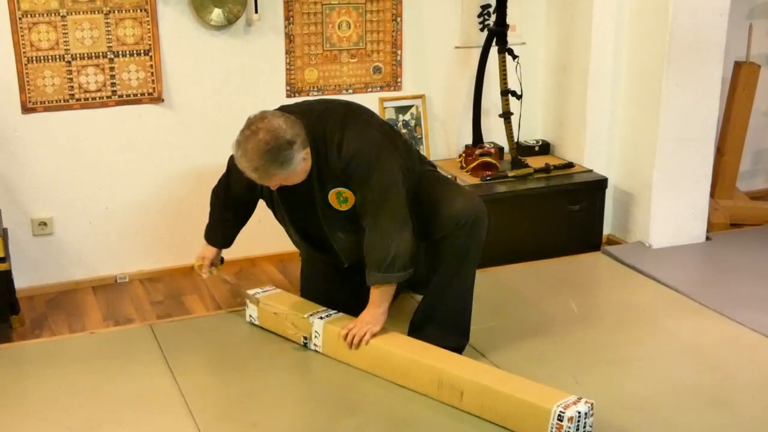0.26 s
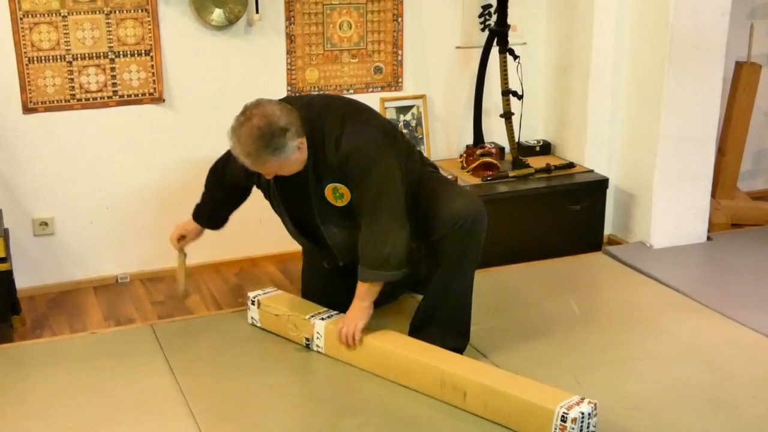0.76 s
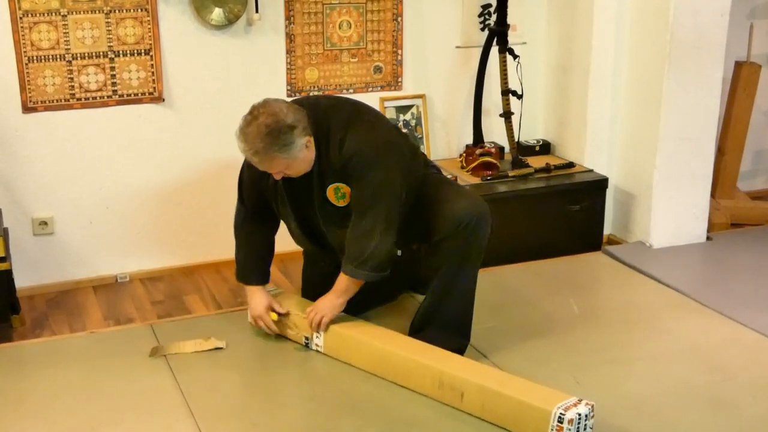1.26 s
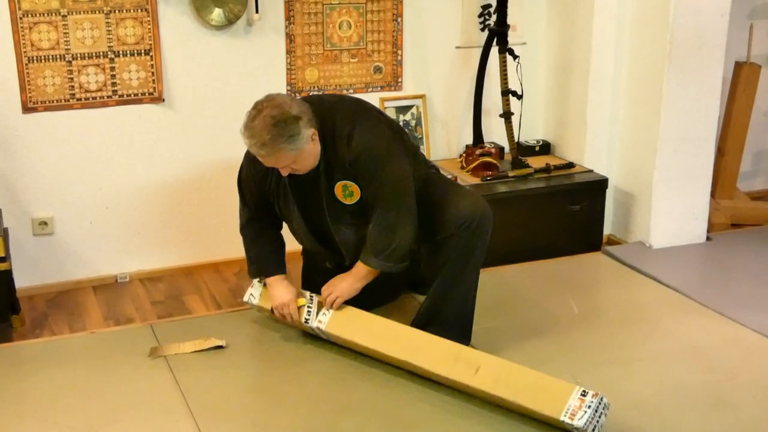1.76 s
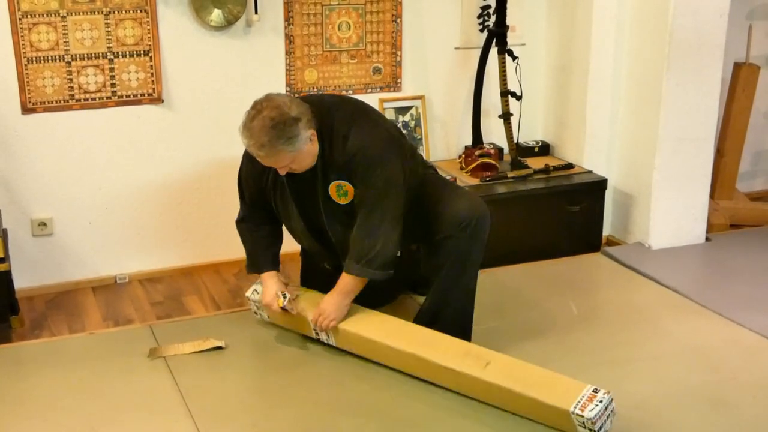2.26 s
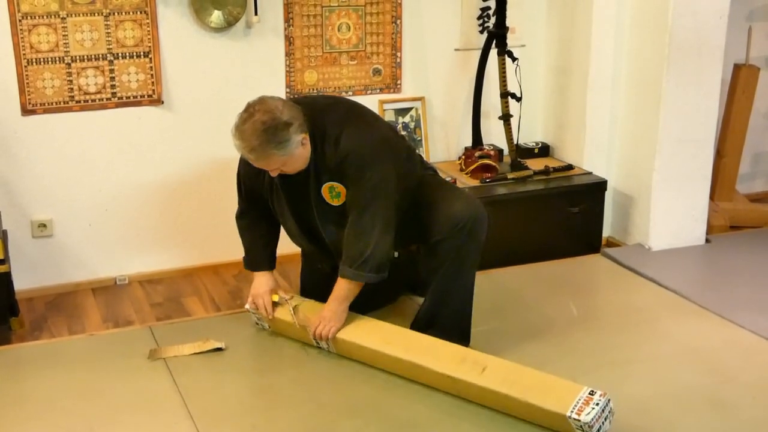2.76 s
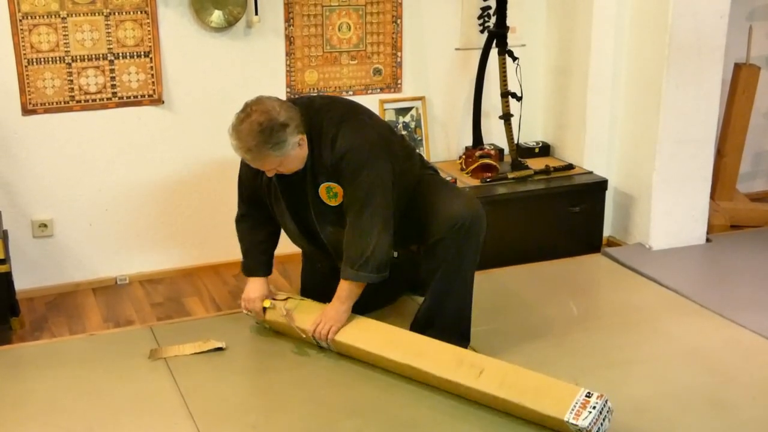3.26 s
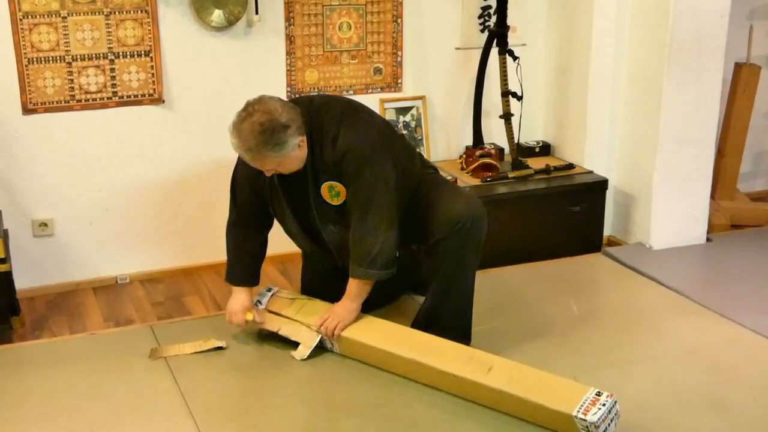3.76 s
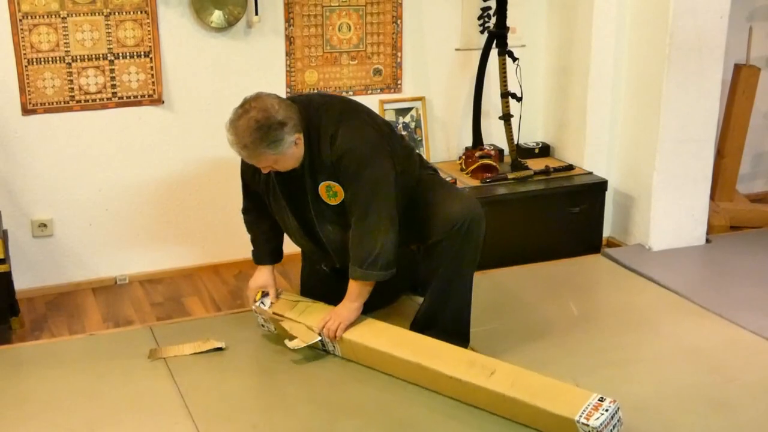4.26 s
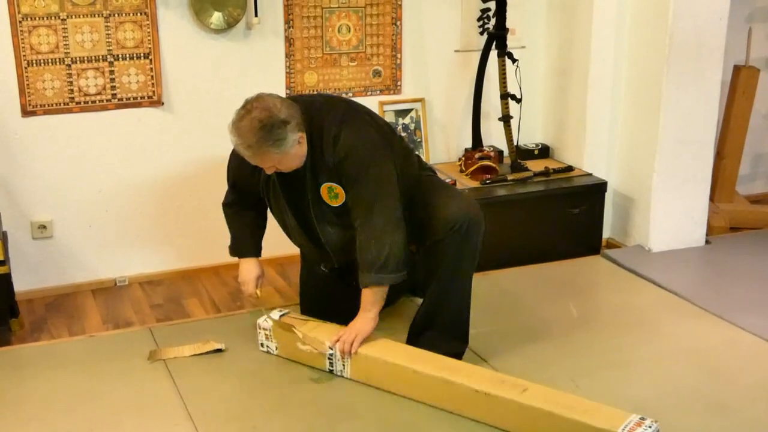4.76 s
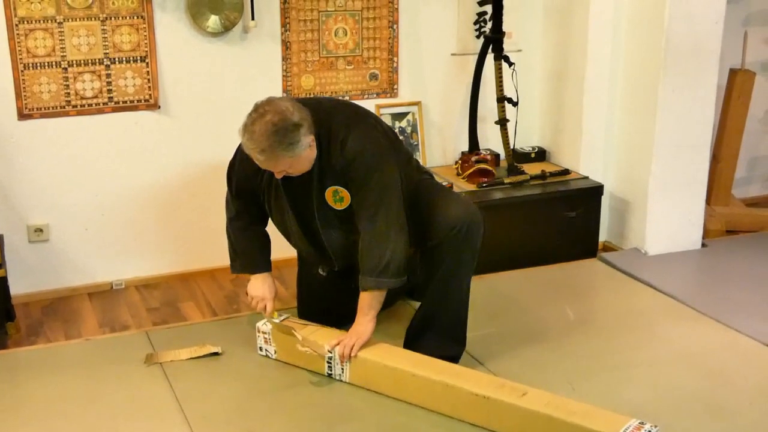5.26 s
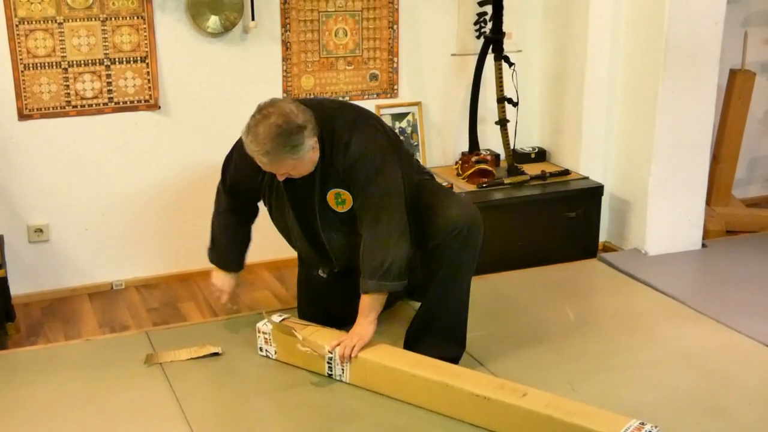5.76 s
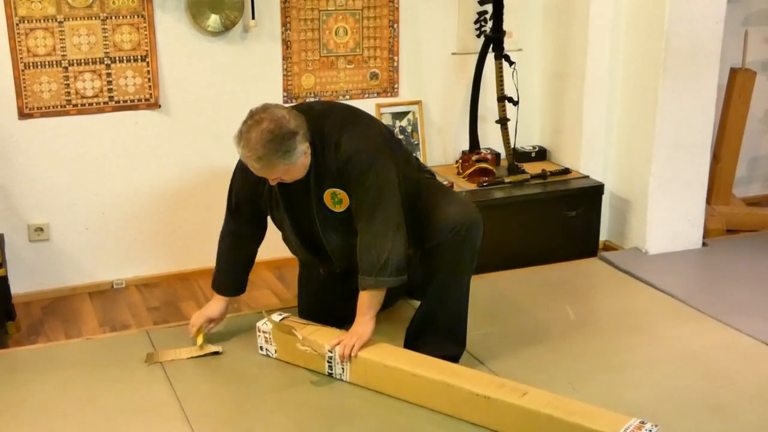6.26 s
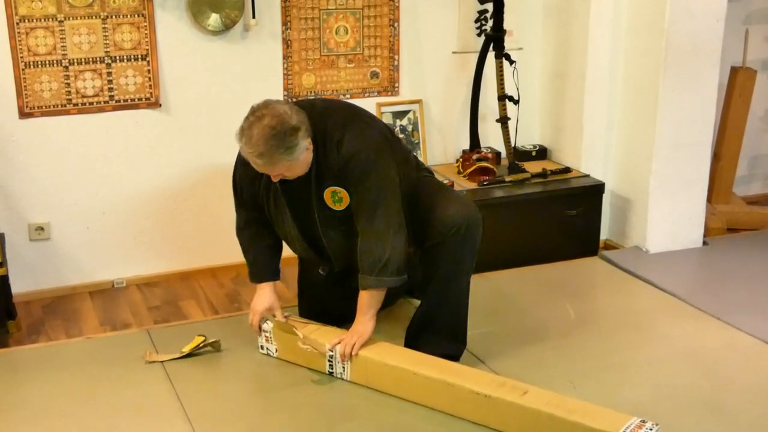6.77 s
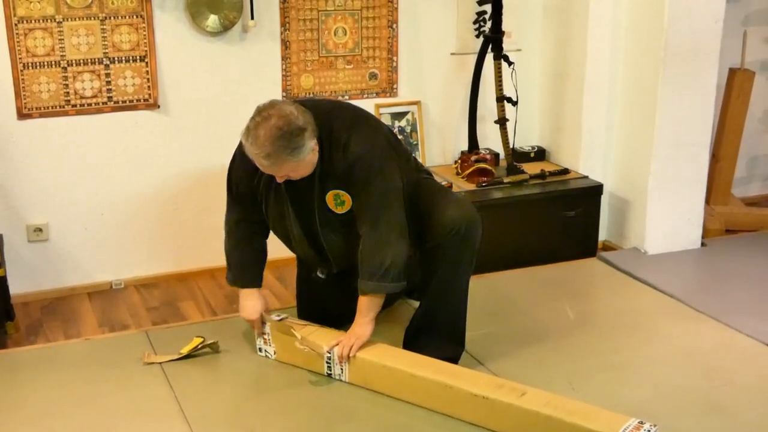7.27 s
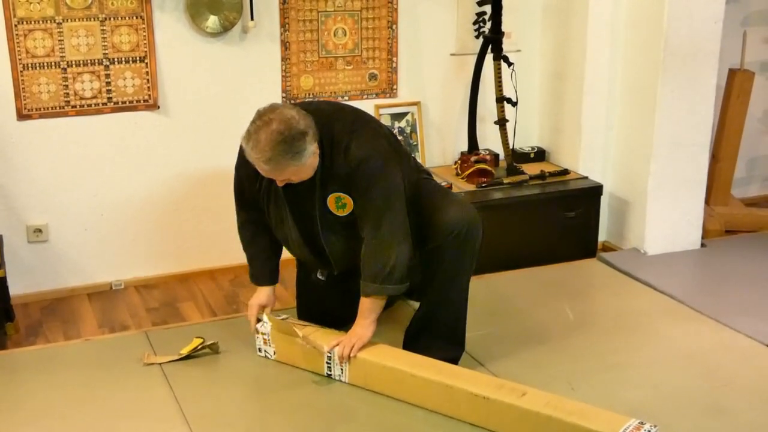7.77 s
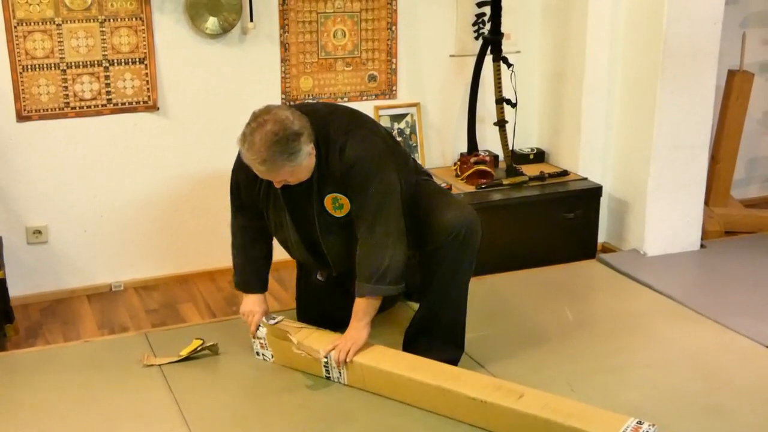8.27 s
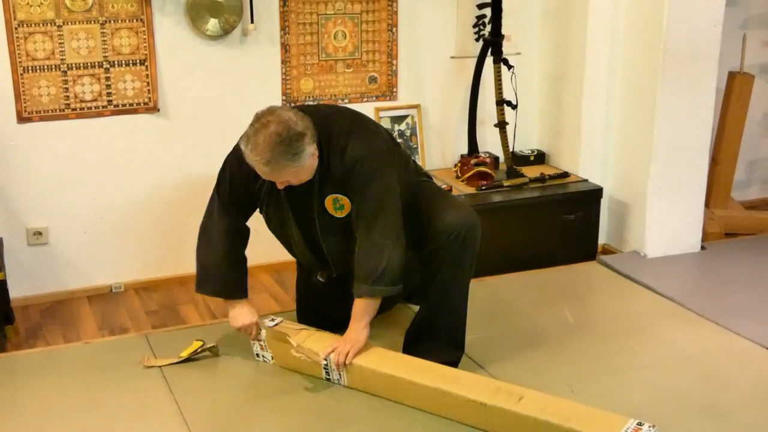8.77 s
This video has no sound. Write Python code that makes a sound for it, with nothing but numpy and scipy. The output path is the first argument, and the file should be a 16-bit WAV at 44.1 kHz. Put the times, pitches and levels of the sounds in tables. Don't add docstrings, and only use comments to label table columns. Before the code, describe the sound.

The sound begins mid-rip: until about 0.4 s packing tape peels from a long cardboard box in bright, dense crackles with small snaps, fading by 0.5 s. Around 1 s the hollow box bumps softly on the mat, with light rubbing. At 1.75 to 2 s come a sharp tear, a strong hollow thump and cardboard buckling, then quieter rustles. From 3.0 to 3.5 s a loud cluster of fibrous rips and another low knock. Small pops and shuffles follow at 4.1 to 4.5 s and 5.2 s; at 5.5 to 5.65 s a hard tear and rapid buckling cracks. At 6.3 s a bright snap lands with low bumps. Faint handling and a small peel around 7.2 s lead to a stuttering cardboard creak from 7.9 to 8.3 s, then brief creaks and a tape peel at 8.5 to 8.9 s. Everything echoes in a bare hall, heard from metres away over faint hush.

```python
import sys
import numpy as np
from scipy import signal
from scipy.fft import rfft, irfft, next_fast_len
from scipy.io import wavfile
from scipy.ndimage import uniform_filter1d, map_coordinates

SR = 44100
rng = np.random.default_rng(int(sys.argv[2]) if len(sys.argv) > 2 else 0)


def magnitude_from_level(level_db):
    exponent = np.asarray(level_db, float) / 20
    return 10 ** exponent


def generate_wav(sig):
    pcm = np.round(np.clip(np.atleast_2d(sig).T, -1, 1) * 32767).astype(np.int16)
    wavfile.write(sys.argv[1], SR, pcm)


N = 398223
LEAD = SR // 2

# (frequency [Hz], level [dB])
AIR_COLOUR = [(40, -60), (100, -19.5), (160, -3.5), (240, -5.5), (330, 1.5), (480, -6), (900, -57)]
# (frequency [Hz], level [dB])
WALL_COLOUR = [(150, -42), (330, -2.5), (450, 0), (580, 0.5), (750, -4.5), (1000, -7), (1500, -40),
               (4000, -65)]
# (frequency [Hz], level [dB])
FLAP_COLOUR = [(400, -29), (900, 0.5), (1200, -0.5), (1500, 0), (2200, -1), (3000, -2), (4500, -16),
               (9000, -50)]
# (frequency [Hz], level [dB])
FILM_COLOUR = [(1000, -46), (2700, -9), (3700, -1.5), (6800, -4), (8300, -6.5), (9800, -3), (11500, -9.5),
               (13000, -30)]
# (slip rate [1/s], size scatter [dB])
SLIP_HABITS = [(900, 4.5), (1200, 11), (2500, 5), (4000, 13)]
# (start [s], wall resonance [Hz], flap resonance [Hz], film resonance [Hz], lift [dB])
HOLDS = [(0, 694, 2000, 4500, 3), (.6, 890, 1540, 3600, 3), (0.957, 560, 1340, 3347, 5),
         (1.18, 590, 1320, 8600, 3.5), (1.735, 982, 2960, 3780, 3), (1.89, 598, 1600, 10300, 3.5),
         (3.02, 670.5, 1506, 10060, 1.5), (3.34, 593, 1390, 3370, 7), (4.09, 564, 1590, 8500, 3.5),
         (4.46, 387, 2000, 7100, 3.5), (5.05, 705, 1912, 4217, 6), (5.215, 784, 1190, 4390, 10.5),
         (5.47, 650, 940, 5600, 4.5), (5.56, 716, 1540, 3100, 4.5), (6.24, 296, 1022, 3870, 6.5),
         (6.325, 1060, 2430, 6840, 8.5), (6.63, 624, 2400, 5000, 4), (6.72, 584, 2800, 6800, 0.3),
         (7.55, 890, 977, 3220, 2), (7.7, 450, 1300, 6000, 2), (7.9, 564, 1350, 2406, 5),
         (8.5, 540, 1202, 3200, 5.5), (8.59, 560, 1856, 9600, 4)]
# (start [s], length [s], pull [dB], fade [dB], film over flap [dB])
PEELS = [(-.4, 0.39, -40, 1.5, 8), (.03, 0.21, -49, -3, 0), (.29, 0.11, -40, 2.5, 3.5),
         (.4, 0.084, -43.5, -3, -3), (.66, 0.28, -53.5, 8.5, 0.5), (.99, 0.16, -55, 10, 5),
         (1.2, 0.29, -56, 5, 2.5), (1.58, 0.14, -55, 7, 2), (1.77, 0.097, -44.5, 7, -6),
         (1.97, 0.21, -44.5, 4, -2.5), (2.2, 0.15, -51.5, -3, 0.5), (2.54, 0.093, -55.5, 1.5, 4.5),
         (2.8, 0.28, -55, -1, 0.5), (3.06, 0.22, -46, -13, 1), (3.37, .15, -38.5, -2, -2),
         (3.55, 0.23, -48, 3.5, -1), (4.13, 0.28, -59, -11, 2.5), (4.55, 0.17, -53.5, 1, 4.5),
         (5.58, 0.047, -39, 0, -4.5), (5.68, 0.15, -52, 14, -24.5), (6.26, 0.027, -55, 6, 4),
         (6.33, 0.073, -41.5, 1, 3), (6.44, .12, -60, 8, 6), (6.68, 0.52, -65.5, -9.5, 3),
         (7.0, 0.093, -66, -1, 0), (7.19, 0.047, -43.5, 7.5, 5.5), (7.27, 0.056, -48.5, 7.5, 5.5),
         (7.35, 0.58, -62, 6.5, 3), (8.63, 0.12, -42, 12.5, 3.5), (8.76, 0.22, -56, 0.5, 7.5)]
# (share [dB], weight of the film column [1])
PEEL_PARTS = [(-23.5, -0.55), (-10, -0.89), (-1, -0.39), (-2, 0.92)]
# (start [s], length [s], pressure [dB], fade [dB], air over its share [dB])
BOARD_RUBS = [(-.4, 0.83, -40, 13.5, 5), (1.25, 0.42, -70.5, -15.5, 0.5), (1.98, 0.54, -64.5, -6, -2),
              (2.58, 0.43, -58.5, -3.5, 14.5), (3.08, 0.36, -52.5, -7.5, -5), (3.52, 0.12, -47.5, 13, 9),
              (3.88, 0.15, -74, 3, -1), (4.11, 0.063, -52, 9.5, 24), (4.6, 0.26, -51, 8.5, -17),
              (5.23, 0.1, -46.5, 4.5, -25), (6.05, 0.15, -67, 1, 1), (6.52, 0.22, -72, -20.5, -12),
              (6.8, 0.31, -54.5, -3.5, 6.5), (7.2, 0.78, -55.5, 7, 4), (7.92, 0.19, -40, 5.5, 11),
              (8.12, 0.2, -42, 2, 6), (8.52, 0.067, -51.5, 0, 22), (8.66, 0.46, -65, -13, 4)]
# (share [dB], weight of the air column [1])
RUB_SPREAD = [(-9.5, 0.5), (-2, 0.19), (-8, 0.034), (-23.5, 0.61)]


def box(span=2000):
    air_hz, rest_db = 246, -82.5
    t = (np.arange(N + LEAD) - LEAD) / SR
    grid, peel = strokes(PEELS, PEEL_PARTS, attack_s=0.038)
    _, rub = strokes(BOARD_RUBS, RUB_SPREAD, attack_s=0.015)
    s, felt_db, ms = blows()
    at = np.round(s * SR).astype(int)[:, None] + LEAD + np.arange(span)
    u = np.arange(span) / (SR / 1000) / np.clip(ms, 1.7, 14)[:, None]
    shape = (u + 1 / ms[:, None]) * np.exp(-2 * u)
    edges = [0] + [round(row[0] * SR) + LEAD for row in HOLDS[1:]] + [N + LEAD]
    colours = [AIR_COLOUR, WALL_COLOUR, FLAP_COLOUR, FILM_COLOUR]
    sound = np.zeros((len(colours), N + LEAD + SR))
    for k, (colour, (rate, scatter_db)) in enumerate(zip(colours, SLIP_HABITS)):
        steady = np.interp(t, grid, peel[k] + rub[k] + magnitude_from_level(rest_db))
        force = steady * slips(rate, scatter_db)
        burst = rng.standard_normal(at.shape) * shape
        if k == 0:
            burst[:, 0] += 1.35 * np.linalg.norm(burst, axis=1)
        else:
            burst[:, 0] += (15 - 4.0 * k) * shape[:, 0]
        burst *= magnitude_from_level(felt_db[k] + 20.5)[:, None] / np.linalg.norm(burst, axis=1, keepdims=True)
        force += np.bincount(at.ravel(), burst.ravel(), N + LEAD)[:N + LEAD]
        for row, a, b in zip(HOLDS, edges, edges[1:]):
            free_hz = row[k] if k else air_hz
            lift_db = row[-1] * (1.7 - 0.35 * k)
            part = signal.fftconvolve(force[a:b], response(colour, free_hz, lift_db))
            sound[k, a:a + len(part)] += part
    return sound[:, :N + LEAD]


def strokes(rows, parts, attack_s):
    release_s, edge_db = 0.039, 15
    jerk_db, jerks_per_s = 4.5, 70
    t = np.arange(-LEAD / SR, N / SR + 1, 1 / 1000)
    share, weight = np.transpose(parts)
    force = np.zeros((len(parts), len(t)))
    for s, length, db, fade_db, lean_db in rows:
        end = s + length
        times = [s - attack_s, s, end, end + release_s]
        levels = [-edge_db, 0, -fade_db, -fade_db - edge_db]
        shape_db = np.interp(t, times, levels, -200, -200)
        force += magnitude_from_level(db + share + weight * lean_db)[:, None] * magnitude_from_level(shape_db)
    jerk = map_coordinates(rng.standard_normal(len(t)), [np.arange(len(t)) * jerks_per_s / 1000])
    return t, force * magnitude_from_level(jerk_db * jerk)


def slips(rate, scatter_db, hiss=0.16):
    chance = rng.random((2, N + LEAD))
    size = magnitude_from_level(-scatter_db * np.log(chance[1] + 1 / 10) / 2) * rng.standard_normal(N + LEAD)
    sparse = size * (chance[0] < rate / SR)
    x = sparse / np.std(sparse) + hiss * rng.standard_normal(N + LEAD)
    return x / np.std(x)


# (time [s], level [dB], loss to other parts [dB], length [ms])
BUMPS = [(.9645, -27, 14, 9.2), (.979, -32.5, 19, 11), (1.016, -34, 17, 8), (1.038, -35, 25, 7.1),
         (1.09, -48, 25, 8), (1.896, -22, 3.5, 7.2), (1.9017, -35, -1, 7.2), (2.71, -46.5, 10, 31),
         (3.29, -29, 12, 7.9), (3.3549, -20, 13, 1.4), (3.48, -29.5, 0, 11.6), (4.105, -45.5, 1, 4),
         (4.468, -29, 14, 4.9), (5.61, -49, 6, 14.8), (6.2946, -24.5, 15, 17), (6.365, -25.5, 44, 16),
         (6.44, -33.5, 40, 16), (7.75, -37, 25, 2.6), (7.916, -31, 16, 2.1), (8.1243, -33, 19, 1.02),
         (8.1839, -33, 13, 2.6), (8.5092, -35.5, 13, 2.2), (8.5448, -31, 24, 1.2)]
# (time [s], level [dB], loss to other parts [dB], length [ms])
BUCKLES = [(.1145, -26, 11, 0.29), (.2115, -25.5, 3.1, 2.6), (1.2033, -39, 6.7, 11),
           (1.903, -15.5, 12, 5.4), (1.9749, -25, 7.8, 11.5), (2.1583, -34.5, 2.7, 16),
           (2.843, -32, 9.9, 4.8), (3.049, -25, 6.6, 2.5), (3.055, -24, 18.4, 7), (3.3549, -26.5, 2.4, 1.4),
           (4.14, -40.5, 3.45, 3.3), (4.3021, -33, 11, 3.7), (4.311, -31, 16, 4.2),
           (4.4618, -28.5, 16, 7.3), (4.479, -29.5, 6.7, 2.6), (5.2236, -29.5, 10, 0.63),
           (5.4865, -20.5, 5, 1.5), (5.4955, -26, 7.9, 1.7), (5.5748, -23, 3.2, 11), (5.5805, -22, 8, 1.7),
           (5.5935, -23, 6, 2.5), (5.604, -21.5, 2.2, 4.5), (5.624, -20, 3.5, 8.5), (7.555, -35.5, 5.6, 19),
           (8.245, -28, 5.9, 16), (8.6179, -33, 12, 11)]
# (time [s], level [dB])
WALL_CREAKS = [(7.913, -32), (7.924, -28.5), (7.9365, -33), (7.948, -31), (7.9605, -25.5), (7.9745, -34),
               (7.989, -28), (7.9985, -31), (8.019, -35), (8.031, -23), (8.0485, -27), (8.065, -27),
               (8.082, -28), (8.102, -26), (8.114, -26), (8.124, -35), (8.1375, -25), (8.173, -25),
               (8.1935, -19.5), (8.2105, -26.5), (8.223, -29), (8.235, -25.5), (8.246, -38), (8.258, -23),
               (8.292, -31), (8.309, -35), (8.331, -33), (8.512, -39), (8.526, -33), (8.5455, -29.5),
               (8.568, -31), (8.5915, -34), (8.6035, -40)]
# (time [s], level [dB], loss to other parts [dB], length [ms])
FLAP_RIPS = [(.2, -30, 6.5, 5.6), (0.3083, -25.5, 7.4, 7.8), (1.743, -23.5, 6.8, 0.46),
             (1.9017, -20.5, 11, 2.7), (1.9291, -16, 5.4, 0.98), (3.0457, -15.5, 6.5, 1.1),
             (3.1232, -24.5, 3.7, 3), (3.2039, -22.5, 5.7, 7.4), (3.2594, -20.5, 5.7, 2.2),
             (3.272, -24, 6, 1.5), (3.279, -19, 6.5, 1), (3.291, -25, 7, 1.8), (3.3633, -16, 27, 2),
             (3.373, -21, 14, 2), (3.405, -32, 15.8, 8), (3.427, -27, 15, 5.3), (3.455, -25, 11, 8.4),
             (5.0634, -44, 2.2, 4.6), (5.2236, -42, 8.3, 2.6), (5.4863, -16.5, 10.4, 1.5),
             (5.522, -21.5, 10, 4.3), (6.2995, -23, 9, 3.7), (6.374, -28, 11, 11), (6.407, -45, 3, 4.4),
             (7.182, -39.5, 4.1, 12), (7.928, -44, 18, 15), (8.09, -47, 22, 16)]
# (time [s], level [dB], loss to other parts [dB], length [ms])
GLUE_SNAPS = [(0.0182, -28, 9.8, 4), (0.044, -20, 8.6, 4.5), (0.0502, -26, 12, 1.5), (0.069, -24, 11, 0.99),
              (0.089, -36, 10, 4.7), (0.095, -23.5, 5.7, 0.97), (0.1152, -22.5, 8.6, 1.1),
              (0.1201, -23.5, 4.6, 0.61), (0.14, -26, 11, 1.1), (.1727, -25.5, 12, 1.4),
              (0.193, -35, 11, 1.2), (0.199, -23, 12, 1.3), (.2104, -24.5, 14, 1.1),
              (0.2318, -22, 6.8, 0.91), (0.26, -26, 11, 1.5), (.268, -36, 11, 3.8), (0.3063, -30, 6.7, 8.7),
              (0.9628, -35, 7, 1.5), (1.592, -38.5, 11.3, 9.2), (1.6132, -40, 8, 1.2),
              (1.618, -32.5, 6.2, 1.5), (1.745, -22.5, 7.4, 1.6), (1.934, -23.5, 20, 2.2),
              (1.9723, -24.5, 12, 8.6), (3.028, -39, 2.4, 1.1), (3.051, -23.5, 5.3, 2),
              (3.1233, -28, 17, 5.2), (3.2586, -28, 9.9, 2), (3.3, -22, 3.8, 6.1), (4.469, -29, 3.6, 4.8),
              (5.0639, -42, 8.3, 5), (5.224, -35.5, 12, 1), (5.477, -24.5, 3.4, 13), (5.4863, -29, 11, 1.1),
              (5.523, -24.5, 9.1, 3.9), (5.627, -37, 10, 10), (6.2503, -39, 11, 12),
              (6.2954, -16.5, 36, 11.5), (6.735, -35, 10, 4.5), (7.1704, -33, 2.6, 17.5),
              (8.592, -48, 7, 15), (8.6175, -50, 9, 13)]
LOSS_SHARES = [(0, 0.74, 0.8, 1.65), (3, 0.08, 1.2, 1.5), (3.5, 1.1, 0.19, 0.97), (3.5, 1.7, 1.16, 0.025)]


def blows():
    loss_db, length_ms = 16, .5
    creaks = [(s, db, loss_db, length_ms) for s, db in WALL_CREAKS]
    kinds = [BUMPS, BUCKLES + creaks, FLAP_RIPS, GLUE_SNAPS]
    s, db, loss_db, ms = np.concatenate(kinds).T
    share = np.repeat(LOSS_SHARES, [len(kind) for kind in kinds], axis=0).T
    return s, db - loss_db * share, ms


def response(spectrum, free_hz, lift_db, width=0.16, size=2048):
    hz = np.fft.rfftfreq(size, 1 / SR)
    bell = np.exp(-np.log((hz + 1) / free_hz) ** 2 / (2 * width ** 2))
    level_db = along(spectrum, hz) + lift_db * bell
    cepstrum = irfft(np.log(magnitude_from_level(level_db)), size)
    cepstrum[1:size // 2] *= 2
    cepstrum[size // 2 + 1:] = 0
    h = irfft(np.exp(rfft(cepstrum)), size)
    return h / np.linalg.norm(h)


def along(points, hz):
    f, v = np.transpose(points)
    return np.interp(np.log(hz + 1), np.log(f + 1), v)


def near(x, step=SR // 4):
    out = np.zeros((2, len(x) + SR))
    fade = np.hanning(2 * step + 1)[:-1] ** 0.78
    x = np.pad(x, (step, 2 * step))
    for start in range(0, len(x) - 2 * step, step):
        part = signal.fftconvolve((x[start:start + 2 * step] * fade)[None], walls(), axes=1)
        out[:, start:start + part.shape[1]] += part
    return out[:, step:]


# (delay [s], level [dB], left over right [dB])
WALL_ECHOES = [(.0052, -4, 6.5), (.0083, -8.5, -14), (0.0102, -4.5, 3), (0.016, -16.5, 3),
               (0.02, -10, 11.5), (0.026, -10, -4)]


def walls(shift=.0002, scatter=0.00041):
    h = np.zeros((2, SR // 20))
    h[:, 0] = magnitude_from_level([.5, -.5])
    for s, db, pan_db in WALL_ECHOES:
        smear = rng.standard_normal((2, 64)) * np.exp(-np.arange(64) / SR / scatter)
        smear[0, 0] += 3.5
        smear = smear[0] + 0.73 * np.gradient(smear[1]) * np.array([[1], [-1]])
        i = round(abs(s + shift * rng.standard_normal()) * SR)
        side_db = np.array([[.5], [-.5]]) * pan_db
        h[:, i:i + 64] += magnitude_from_level(db + side_db) * smear / np.linalg.norm(smear[0])
    return h


def boom(x, tail_db=-29, t60=0.68, alike=0.85):
    t = np.arange(SR) / SR
    envelope = magnitude_from_level(tail_db - 60 * t / t60) * np.minimum(t / 0.023, 1)
    a, b = rng.standard_normal((2, SR)) * envelope
    turn = np.arccos(alike) / 2
    tail = a * np.cos(turn) + np.array([b, -b]) * np.sin(turn)
    return signal.fftconvolve(x[None], tail, axes=1)


# (frequency [Hz], time to fall 60 dB [s])
HALL_T60 = [(250, 0.73), (600, 0.61), (1500, 0.89), (4000, 0.91), (8000, 0.59), (12000, 0.36)]
# (frequency [Hz], correlation [1])
HALL_LIKENESS = [(280, 0.84), (600, 0.87), (2700, 0.76), (6000, 0.74), (12500, 0.3)]


def hall(x, tail_db=-33, delay=0.0022, build=0.0028, plateau=0.066):
    hz, t, z = signal.stft(x, SR, nperseg=512, noverlap=384)
    t = t[:450]
    fill = 1 - np.exp(-np.maximum(t - delay, 0) / build)
    fall_db = 60 * np.maximum(t - plateau, 0) / along(HALL_T60, hz)[:, None]
    decay = magnitude_from_level(tail_db - fall_db) * fill
    fine = uniform_filter1d(np.abs(z) ** 2, size=2, axis=0)
    broad = uniform_filter1d(np.abs(z) ** 2, size=12, axis=0)
    power = np.where(hz[:, None] < 1800, fine, broad)
    energy = np.abs(signal.fftconvolve(power, 128 * decay ** 2, axes=1)[:, :z.shape[1]])
    noise = rng.standard_normal((2, len(x)))
    field = signal.stft(noise, SR, nperseg=512, noverlap=384)[2]
    field = stereo(field / np.std(field), hz, HALL_LIKENESS) * np.sqrt(energy)
    return signal.istft(field, SR, nperseg=512, noverlap=384)[1]


def stereo(z, hz, alike):
    turn = np.arccos(np.clip(along(alike, hz), -1, 1))[:, None] / 2
    common, apart = z[0] * np.cos(turn), z[1] * np.sin(turn)
    return np.array([common + apart, common - apart])


# (frequency [Hz], level [dB])
HUSH_COLOUR = [(25, -47), (100, -6), (300, 2.5), (600, 1), (1500, -10.5), (5000, -13.5), (12500, -21.5)]


def hush():
    hz, _, z = signal.stft(rng.standard_normal((2, N + 1024)), SR, nperseg=1024)
    z = stereo(z, hz, [(50, .02), (500, 0.12), (8000, 0.61)])
    z = z * magnitude_from_level(along(HUSH_COLOUR, hz))[:, None]
    x = signal.istft(z, SR, nperseg=1024)[1][:, :N]
    return magnitude_from_level(-53.5) * x / np.std(x)


def scene():
    parts = box()
    air, board = parts[0], parts[1:].sum(axis=0)
    heard = [near(air + board), boom(air), hall(board)]
    return sum(x[:, LEAD:LEAD + N] for x in heard) + hush()


def roll_off(x):
    return signal.sosfilt(signal.butter(12, 13080, fs=SR, output="sos"), x)


# (frequency [Hz], gain [dB])
MIC_BAND = [(60, 3.5), (130, -1), (11500, -0.5), (12300, -1), (12600, -22), (13200, -47)]
# (frequency [Hz], gain [dB])
PORT_WIDTH = [(30, 12), (70, 6), (130, -1), (300, -2.5), (900, 2.5), (6000, 0.5), (10500, -0.5),
              (12300, 1.5)]


def record(dry):
    size = next_fast_len(N + 4096)
    hz = np.fft.rfftfreq(size, 1 / SR)
    left, right = rfft(dry, size) * magnitude_from_level(along(MIC_BAND, hz))
    mid = (left + right) / 2
    side = (left - right) / 2 * magnitude_from_level(along(PORT_WIDTH, hz))
    mix = irfft([mid + side, mid - side], size)[:, :N]
    return roll_off(mix)


dry = scene()
out = record(dry)
generate_wav(out)
```